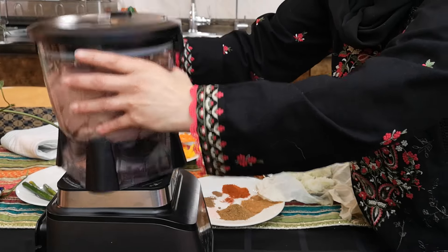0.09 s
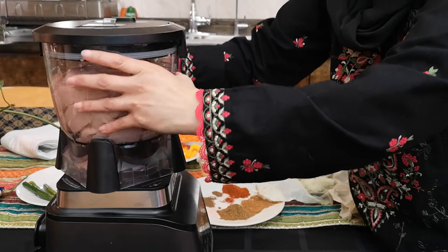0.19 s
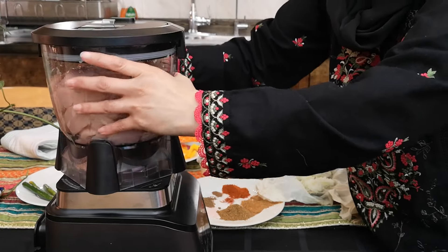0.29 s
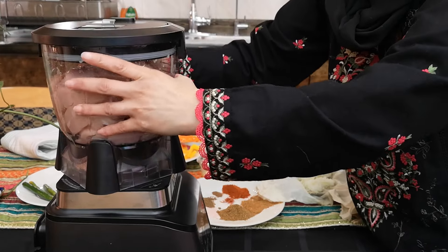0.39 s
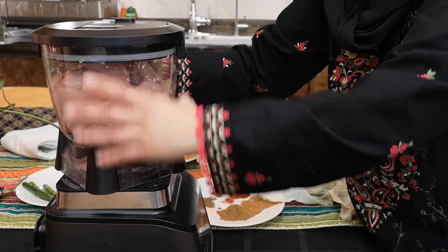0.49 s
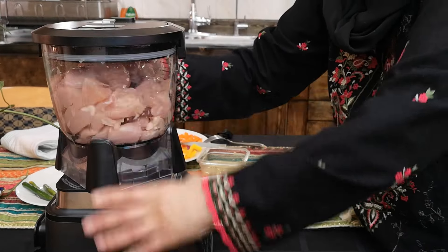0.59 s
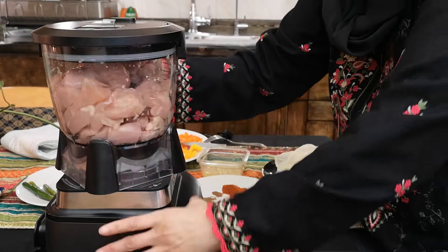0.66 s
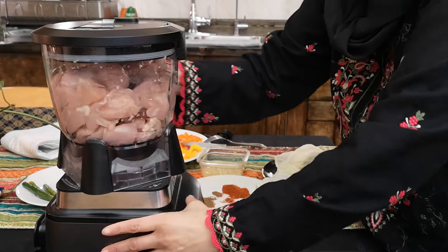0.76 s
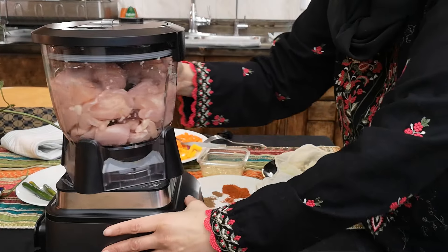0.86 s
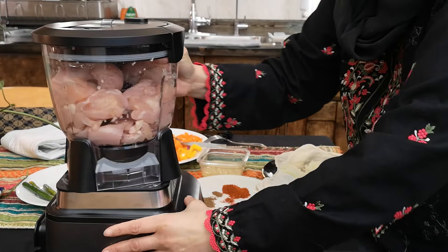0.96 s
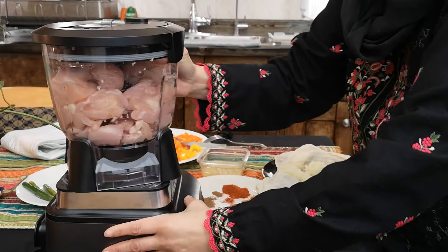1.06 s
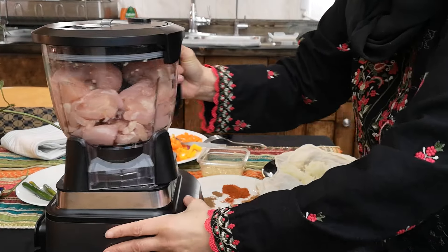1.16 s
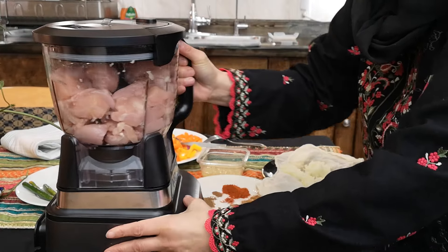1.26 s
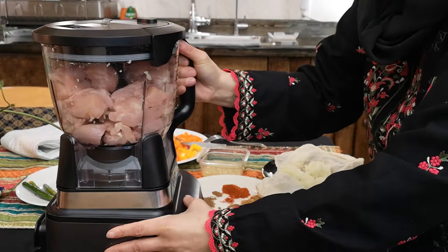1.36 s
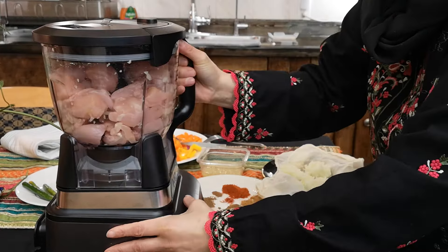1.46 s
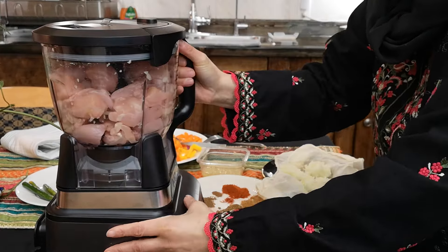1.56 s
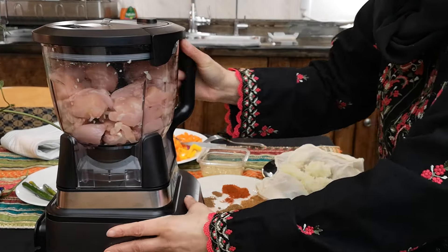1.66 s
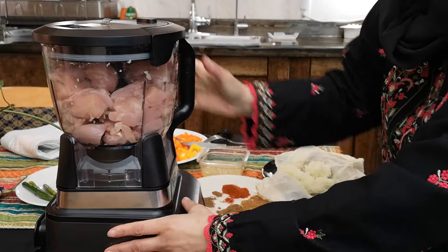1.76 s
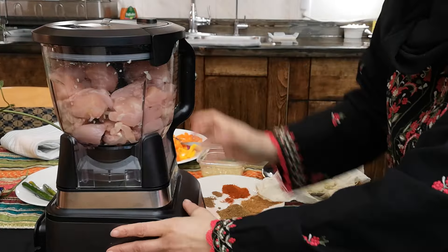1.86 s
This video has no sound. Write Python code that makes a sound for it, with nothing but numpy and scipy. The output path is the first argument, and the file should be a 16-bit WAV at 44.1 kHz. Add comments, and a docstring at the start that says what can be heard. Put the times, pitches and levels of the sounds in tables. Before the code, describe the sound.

Food processor's plastic bowl knocks onto its base, then twists until the catch snaps shut

```python
"""Over room air and a far-off hum, a food processor's plastic bowl knocks onto its base, then twists
until its catch snaps shut, settles, and is let go. Each contact is a short noise rattle coloured by
the plastic; knocks also ring the bowl, and a shiver of noise jingles the blade spindle. Dense noise
echoes make the hard kitchen, slow sines the shaking counter, and filtered noise the air, hum and sleeve.
The recorder turns quiet passages further down."""
import sys
import numpy as np
from scipy import signal
from scipy.fft import rfft, irfft
from scipy.io import wavfile
from scipy.ndimage import uniform_filter1d

SR = 44100
rng = np.random.default_rng(int(sys.argv[2]) if len(sys.argv) > 2 else 0)


def volts(x):
    """Linear amplitude factor 10**(x/20) for a level x in dB, scalar or array-like."""
    e = np.asarray(x, float) / 20
    return 10 ** e


def pcm_store(signal):
    """Save signal as 16-bit PCM."""
    levels = np.round(np.clip(np.atleast_2d(signal), -1, 1) * 32767)
    wavfile.write(sys.argv[1], SR, levels.astype(np.int16).T)


N = 83790   # samples, 1.9 s
QUIET_DEPTH_DB = 7.5   # most that the recorder turns quiet sound down


def rms_one(x):
    """Scales a sound to an average (rms) level of 1."""
    return x / np.sqrt(np.mean(x ** 2) + 1e-20)


def at_hz(points, hz):
    """Reads a table's curve at the given frequencies, along a logarithmic pitch scale."""
    points = np.array(points)
    return np.interp(np.log(hz), np.log(points[:, 0]), points[:, 1])


def band_pass(x, low, high):
    """Keeps only the sound between two frequencies in Hz."""
    return signal.sosfilt(signal.butter(2, [low, high], "band", fs=SR, output="sos"), x)


def ring(drive, hz, t60):
    """A resonance: a unit click sets a sine of height 1 ringing, which falls 60 dB in t60 (5 ms or more)."""
    r = volts(-60 / (max(t60, .005) * SR))
    w = 2 * np.pi * hz / SR
    return signal.lfilter([0, np.sin(w)], [1, -2 * r * np.cos(w), r * r], drive + 1e-18)


def causal(gain_db):
    """Minimum-phase spectrum with the given gains on an FFT grid: a filter that never sounds early."""
    cepstrum = irfft(gain_db * np.log(10) / 20)
    half = len(cepstrum) // 2
    return np.exp(rfft(np.concatenate([cepstrum[:1], 2 * cepstrum[1:half], np.zeros(half)])))


def bands(size, shape):
    """Stereo noise in third octaves, each with its likeness and lean, times shape(Hz)."""
    # how alike left and right are: f/Hz, likeness (1 same, 0 unrelated, -1 opposite)
    likeness = [(60, 1), (130, .97), (290, .74), (640, .0), (1410, .1), (3100, -.1), (6820, .05),
                (15000, .4)]
    # how far the noise leans to the left: f/Hz, left minus right level/dB
    left_lean = [(60, 0), (290, -.5), (640, 3), (1410, -1.5), (3100, -2.5), (5500, 2.4), (9000, -.7),
                 (15000, .4)]
    out = 0
    edges = 14 * 2 ** np.arange(0, 10.4, 1 / 3)
    white = rng.standard_normal((2, 2, size + SR // 2))
    for k, (low, high) in enumerate(zip(edges, edges[1:])):
        # neighbouring bands use different noise; the filter's first half second is dropped
        mid, side = band_pass(white[k % 2], low, high)[:, SR // 2:]
        hz = np.sqrt(low * high)
        alike = np.clip(at_hz(likeness, hz), -1, 1)
        lean = volts(at_hz(left_lean, hz) / 2 * np.array([[1], [-1]]))
        stereo = np.sqrt(1 + alike) * mid + np.sqrt(1 - alike) * side * [[1], [-1]]
        out = out + shape(hz) * lean * stereo
    return out


def background():
    """Shaped noise for room air, a narrow resonance driven by noise for the hum, a noise swell for cloth."""
    # tone of the room air: f/Hz, relative level/dB
    air_colour = [(8.8, -30), (15, 6.5), (32, 0.5), (53, -31), (68, -18), (92, -1), (134, -17.5),
                  (155, -11), (233, -16.5), (294, -16.5), (455, -23.5), (543, -33.5), (665, -24.5),
                  (944, -26.5), (1740, -19), (3310, -33), (16000, -50)]
    # distant appliance's hum: t/s, level/dB
    hum_levels = [(0, -48.5), (.15, -45), (.55, -47.5), (.88, -45), (1.0, -54), (1.25, -57), (1.9, -58)]
    # brush of a sleeve: centre t/s, half length/s, level/dB
    rustle = (0.945, 0.062, -57.5)
    air_db, hum_hz, hum_width_hz = -44.5, 87, 2.5
    t = np.arange(N) / SR
    air = volts(air_db) * rms_one(bands(N, lambda hz: volts(at_hz(air_colour, hz))))
    # the narrow resonance makes the hum waver; its first second is dropped
    hum = rms_one(ring(rng.standard_normal(N + SR), hum_hz, 1.5 / hum_width_hz)[SR:])
    hum = hum * volts(np.interp(t, *np.transpose(hum_levels)))
    centre, half_length, rustle_db = rustle
    cloth = band_pass(rng.standard_normal((2, N)), 3500, 10000)
    cloth = volts(rustle_db) * np.exp(-((t - centre) / half_length) ** 2) * cloth
    return air + hum + cloth


def contacts(rows, colour):
    """Each contact: a dying grainy rattle through the colour of the part; also returns the push on the bowl."""
    attack_s, lead_db = .0003, 14
    evenness = .7   # share of a rattle's chance peaks and dips that is evened out
    bass_below_hz, treble_above_hz = 500, 2800
    size = 8192
    out, push = np.zeros(N + size), np.zeros(N + size)
    t = np.arange(size) / SR
    hz = np.maximum(np.fft.rfftfreq(size, 1 / SR), 10)
    for s, db, length, bass_db, treble_db in rows:
        grains = rng.standard_normal(size) * volts(2.07 * rng.exponential(1, size))
        fade = np.exp(-t / max(length, .0005)) * (t < .1)
        rattle = grains * fade * (1 - np.exp(-t / attack_s))
        rattle[0] = volts(lead_db)   # first touch
        spectrum = rfft(rattle)
        rattle = irfft(spectrum * causal(-evenness * 20 * np.log10(abs(spectrum) + .1)))
        spectrum = rfft(rattle)
        bass = bass_db / (1 + (hz / bass_below_hz) ** 4)
        treble = treble_db / (1 + (treble_above_hz / hz) ** 4)
        hit = irfft(spectrum * causal(at_hz(colour, hz) + bass + treble))
        # equal energy for every contact before its level, bass and treble act
        energy = np.sum(abs(spectrum * volts(at_hz(colour, hz))) ** 2) * 2 / size
        i = int(s * SR)
        out[i:i + size] += volts(db) * hit * np.sqrt(0.0045 * SR / energy)
        push[i] += volts(db + bass_db)
    return out[:N], push[:N]


# In every contact table below: t/s, relative level/dB, fade time/s, bass/dB, treble/dB.
# In every colour table below: f/Hz, relative level/dB.


def knocks():
    """The bowl meets its base in a run of rattles coloured by the plastic."""
    # contacts of bowl and base
    rows = [(.162, -23, 0.0053, -2, -0.5), (.187, -26.5, 0.015, 1.5, 10.5), (.198, -9.5, 0.0033, -5, -2),
            (.213, -10.5, 0.0038, 3.5, -2), (.2405, 0.5, 0.00365, 2, 6), (.253, -11, 0.0053, 2, -29),
            (.847, -32.5, 0.0062, 11.5, -1)]
    # colour of the bowl on its base
    colour = [(29, -6), (70, -10), (100, -23), (160, -6.5), (198, -2), (240, -7), (290, 3.5), (340, -4.5),
              (400, -13), (500, -13.5), (680, -12.5), (900, -12), (1330, -11.5), (1700, -14.5),
              (2400, -17.5), (2900, -23), (3900, -28.5), (5500, -28), (7700, -29), (9400, -33.5),
              (13800, -52), (16000, -105)]
    return contacts(rows, colour)


def bowl(push):
    """The pushes set the loaded bowl's modes ringing, a hollow tone."""
    # bowl modes: f/Hz, relative level/dB, t60/s
    modes = [(159.3, -26.5, 0.1), (209, -31, 0.078), (282, -25, 0.056), (303, -39, 0.19),
             (340, -18.5, 0.11), (680, -27, 0.048), (796, -32, .06), (1338, -41, 0.11)]
    return sum(volts(db) * ring(push, hz, t60) for hz, db, t60 in modes)


def kitchen(x):
    """Hard surfaces answer with dense echoes that build after the first wall and die band by band."""
    # tone of the echoes: f/Hz, relative level/dB
    room_colour = [(60, -7.5), (200, -2.5), (400, -5), (1000, -1.5), (3000, 1.5), (7000, -3.5),
                   (14000, -3.5)]
    # dying of the long echoes: f/Hz, t60/s
    room_t60 = [(60, 1), (250, .45), (1000, 0.48), (3000, 0.48), (7000, 0.39), (14000, 0.41)]
    room_db, first_echo_s, build_s = 1, 0.0081, 0.0013
    early_db, early_t60_s = -4, 0.041   # a first rush of echoes
    counter_share = .3   # echoes off the counter, before the first wall
    t = np.arange(int(.7 * SR)) / SR
    late = np.maximum(t - first_echo_s, 0)
    early = volts(early_db - 60 * late / early_t60_s)

    def fading(hz):
        return volts(at_hz(room_colour, hz)) * (volts(-60 * t / at_hz(room_t60, hz)) + early)

    build = 1 - (1 - counter_share) * np.exp(-late / build_s)
    tail = bands(len(t), fading) * build
    return volts(room_db) * signal.fftconvolve(x[None], tail / np.sqrt(0.027 * SR), axes=1)[:, :N]


def shake():
    """Slow dying sine swings of the counter, felt by both microphones alike."""
    # swings, each first downward: start t/s, f/Hz, level/dB before rise and fall, rise time/s, t60/s
    swings = [(0.277, 22.84, -10.5, 0.023, 2.35), (1.49, 26, -9.5, 0.036, 0.19)]
    stop_s = 0.25   # each swing is cut off about this long after its start, as by the recorder's gate
    out = 0
    for s, hz, db, rise, t60 in swings:
        t = np.maximum(np.arange(N) / SR - s, 0)
        swell = volts(db - 60 * t / t60) * (1 - np.exp(-t / rise))
        cut_off = 1 / (1 + (t / stop_s) ** 12)
        out = out - swell * cut_off * np.sin(2 * np.pi * hz * t)
    return out


def jingle():
    """A brief shiver of noise drives the blade spindle's metallic modes."""
    # shiver: rise time/s, fall time/s, relative level/dB
    shiver = (0.0048, 0.012, -32)
    # spindle modes: f/Hz, relative level/dB, t60/s (held to 0.03 s at most below)
    modes = [(2410, 0, 0.034), (3700, -9, 0.013), (4220, 3.5, 0.016), (4284, -1.5, 0.037),
             (6400, -6, 0.011), (7610, 5.5, 0.024), (7950, -1, 0.012), (8000, -10, .012),
             (10450, -5.5, 0.014), (11050, -19, .012), (11300, -24, .012), (12060, -25, .015)]
    start_s = .410
    rise, fall, db = shiver
    t = np.maximum(np.arange(N) / SR - start_s, 0)
    drive = rng.standard_normal(N) * (1 - np.exp(-t / rise)) * np.exp(-t / fall) * volts(db)
    return sum(volts(mode_db - 16) * ring(drive, hz, min(t60, .03)) for hz, mode_db, t60 in modes)


def slides():
    """The bowl twists in its seat: short rattles of plastic on plastic."""
    # contacts of the twisting bowl
    rows = [(1.318, -16, 0.0035, 0, 0), (1.330, -14.5, .012, 0, 0)]
    # colour of the bowl in its seat
    colour = [(60, -31.5), (200, -18), (320, 1), (430, -14), (700, -4.5), (1100, -7.5), (1480, -1.5),
              (2000, -15), (2650, -6), (3100, -13.5), (3800, -25.5), (5100, -20), (6200, -26),
              (7400, -11.5), (8300, -18), (9300, -19.5), (11500, -32.5), (14400, -44), (16000, -58)]
    return contacts(rows, colour)[0]


def meets():
    """The bowl's tab meets the catch: rattles whose push also rings the bowl."""
    # contacts of tab and catch
    rows = [(1.366, -11, 0.0042, 2.64, 2.2), (1.379, -15, 0.0067, 4.8, -1.4)]
    # colour of the tab on the catch
    colour = [(60, -33), (180, -9), (260, 0), (300, -0.5), (430, -20), (620, -12), (770, -3), (950, -12.5),
              (1480, -11), (2410, -4.5), (3000, -15.5), (3800, -27.5), (5100, -17.5), (6200, -25.5),
              (7400, -23), (8300, -26), (10000, -22), (11500, -40), (14400, -37), (16000, -62)]
    return contacts(rows, colour)


def snap():
    """The catch snaps shut: one very short, bright rattle."""
    # contact of the snapping catch
    rows = [(1.4039, -1.5, 0.0023, 0, 0.015)]
    # colour of the catch
    colour = [(240, -29), (400, -23), (481, -40), (801, -34), (879, -12), (1110, -4), (1730, -10.5),
              (2800, -1.5), (3120, -13), (3990, -16), (5110, 2), (6240, -6), (8760, -4), (14800, -31),
              (16000, -53)]
    return contacts(rows, colour)[0]


def settles():
    """The bowl settles in ever weaker rattles."""
    # contacts of the settling bowl
    rows = [(1.429, -16.5, 0.003, 0, 0), (1.452, -24, 0.0028, 0, 0), (1.477, -30.5, 0.0032, 0, 0)]
    # colour of the settling bowl
    colour = [(100, -26.5), (270, -10), (307, 0), (345, -13), (800, -36), (1000, -8.5), (1200, -32),
              (3000, -43), (16000, -98)]
    return contacts(rows, colour)[0]


def let_go():
    """The hand leaves the handle: two faint rattles."""
    # contacts of hand and handle
    rows = [(1.7792, -24.5, 0.005, 0, 0.0039), (1.8093, -26.5, 0.016, 0, 0)]
    # colour of the handle
    colour = [(240, -40), (400, -22), (588, -32), (697, 3), (865, -16), (1140, -4.5), (1420, -14.5),
              (1900, -4.5), (2180, -16), (2590, -8.5), (3310, -19), (7170, -5.5), (16000, -47)]
    return contacts(rows, colour)[0]


def scene():
    """Adds the sources, the delay to the right microphone, the kitchen and the background."""
    direct_db, right_lag_s = -2.5, 0.000302
    knock, push = knocks()
    meet, nudge = meets()
    rattles = knock + meet + slides() + snap() + settles() + let_go()
    near = volts(-7) * rattles + bowl(push + nudge) + jingle()
    samples = np.arange(N)
    right = np.interp(samples - right_lag_s * SR, samples, near)
    direct = volts(direct_db) * np.array([near, right])
    # the background is raised by as much as the recorder can turn it down
    return direct + kitchen(near) + shake() + background() * volts(QUIET_DEPTH_DB)


def band_limit(x):
    """A steep low-pass at the top of the band."""
    return signal.sosfilt(signal.butter(12, 16460, fs=SR, output="sos"), x)


def record(dry):
    """An expander lowers whatever falls below a threshold; peaks are rounded, the top is cut."""
    below_db, slope, release_db_per_s, smooth_s = -34.5, 1, 305, .002
    cutoff_hz = 16600
    # the expander listens above the bass only
    heard = signal.sosfilt(signal.butter(2, 200, "high", fs=SR, output="sos"), dry.mean(axis=0))
    level = 10 * np.log10(uniform_filter1d(heard ** 2, size=400) + 1e-12)
    # after a peak the followed level falls no faster than the release
    ramp = release_db_per_s * np.arange(N) / SR
    level = np.maximum.accumulate(level + ramp) - ramp
    gain_db = np.clip(slope * (level - below_db), -QUIET_DEPTH_DB, 0)
    r = np.exp(-1 / (smooth_s * SR))
    gain_db = signal.lfilter([1 - r], [1, -r], gain_db, zi=[r * gain_db[0]])[0]
    rounded = 1.2 * np.tanh(dry * volts(gain_db) / 1.2)
    mix = signal.sosfilt(signal.cheby2(12, 60, cutoff_hz, fs=SR, output="sos"), rounded)
    return band_limit(mix)


dry = scene()
out = record(dry)
pcm_store(out)
```